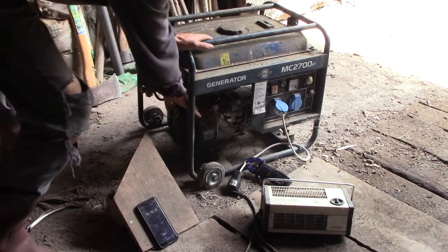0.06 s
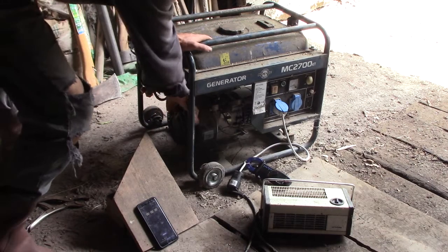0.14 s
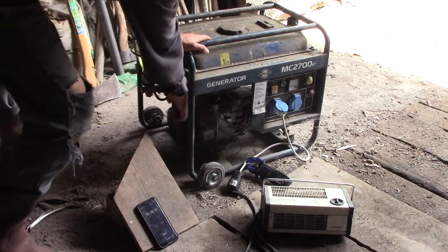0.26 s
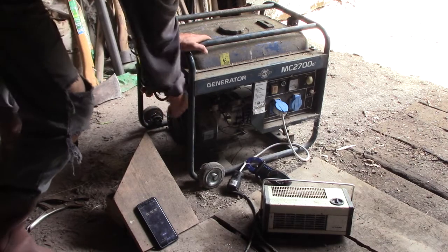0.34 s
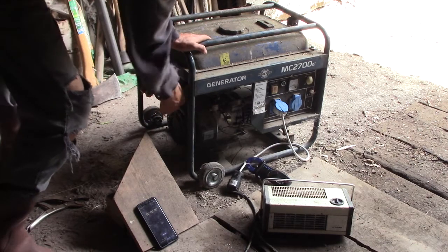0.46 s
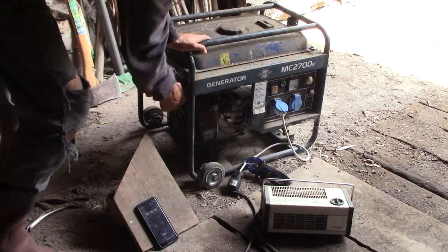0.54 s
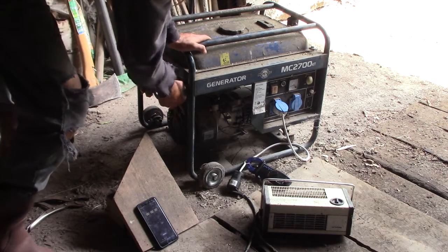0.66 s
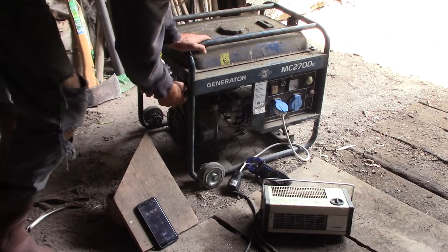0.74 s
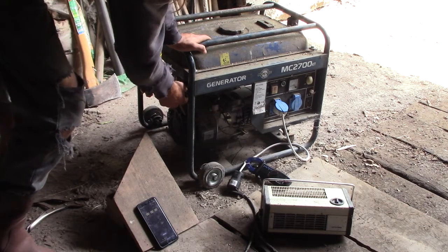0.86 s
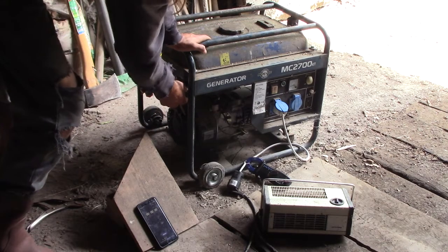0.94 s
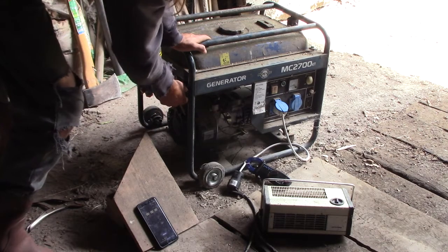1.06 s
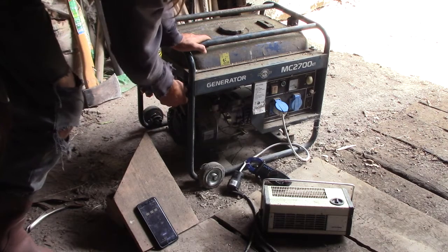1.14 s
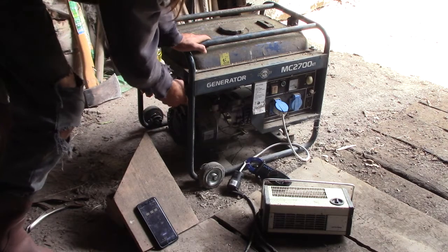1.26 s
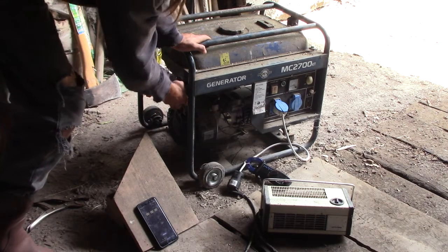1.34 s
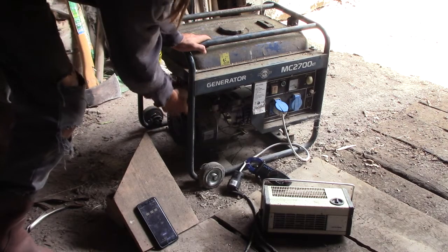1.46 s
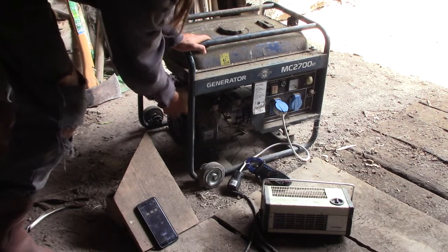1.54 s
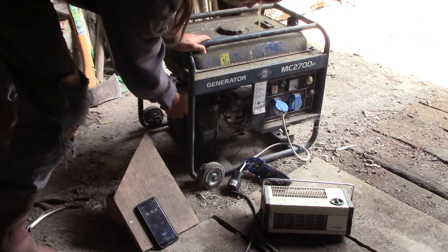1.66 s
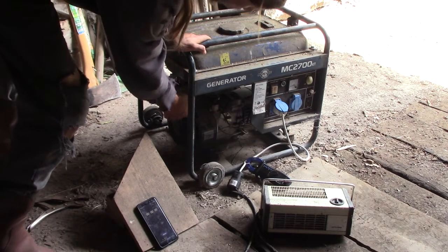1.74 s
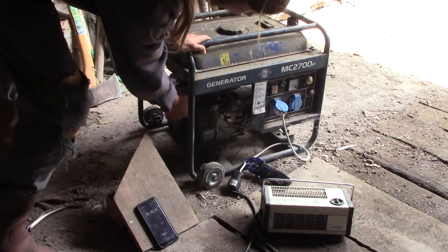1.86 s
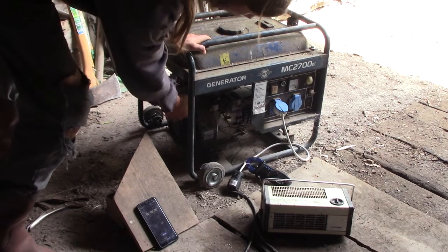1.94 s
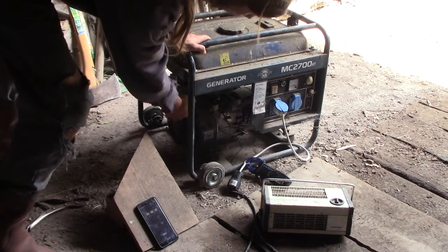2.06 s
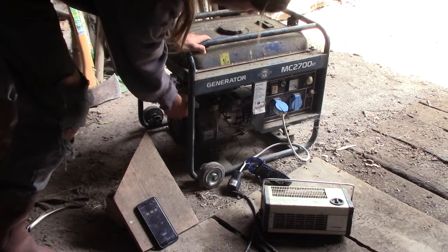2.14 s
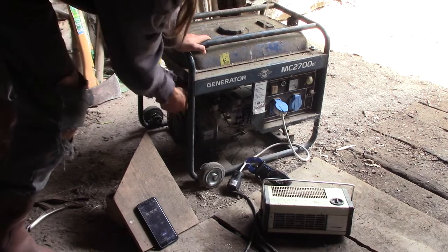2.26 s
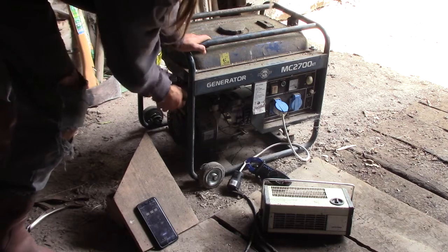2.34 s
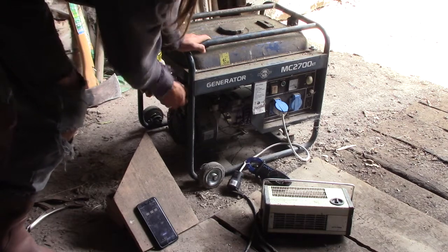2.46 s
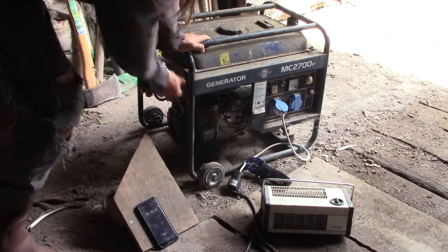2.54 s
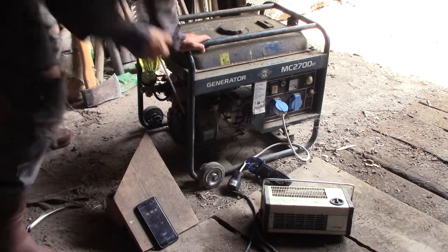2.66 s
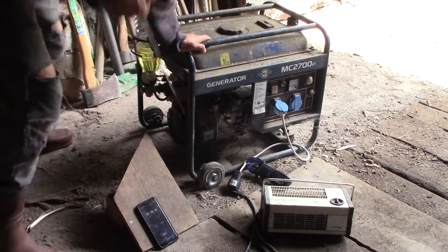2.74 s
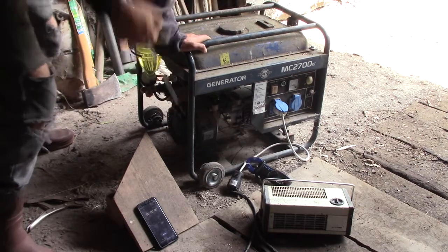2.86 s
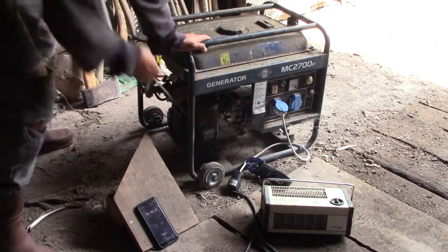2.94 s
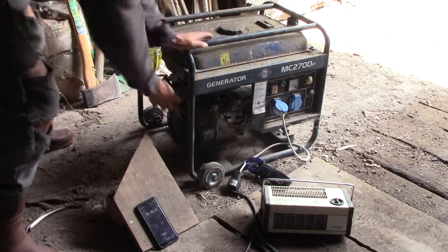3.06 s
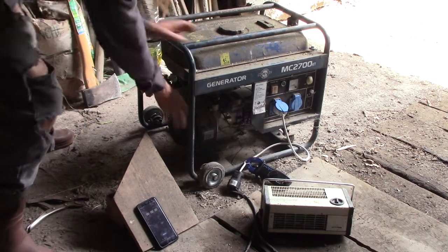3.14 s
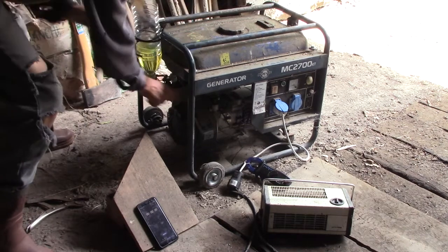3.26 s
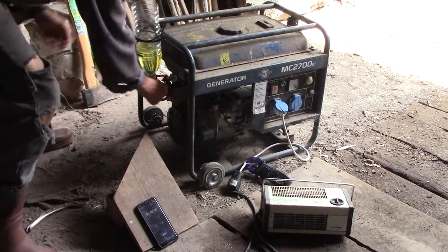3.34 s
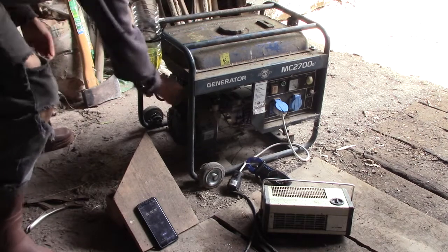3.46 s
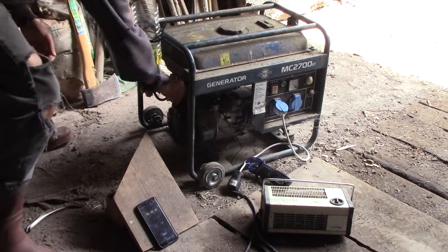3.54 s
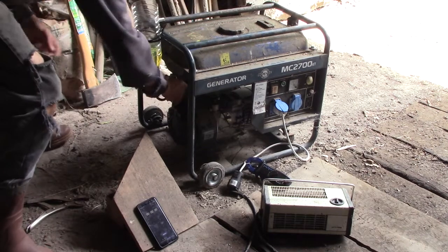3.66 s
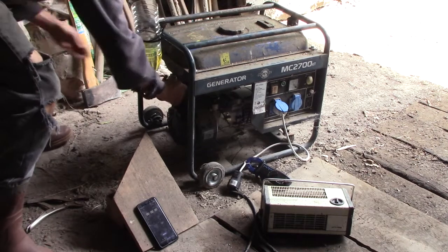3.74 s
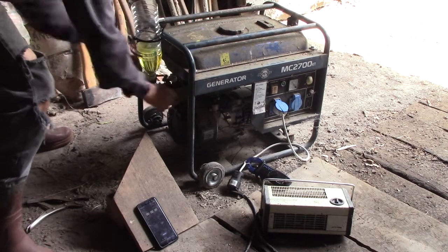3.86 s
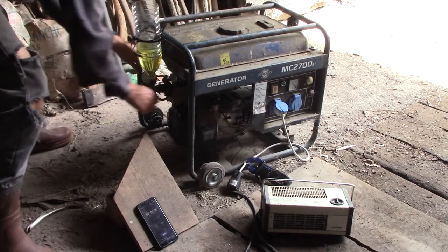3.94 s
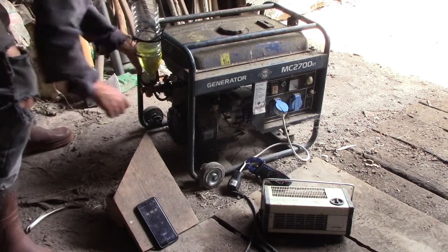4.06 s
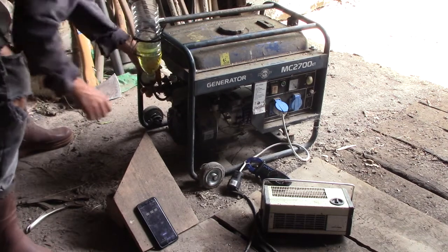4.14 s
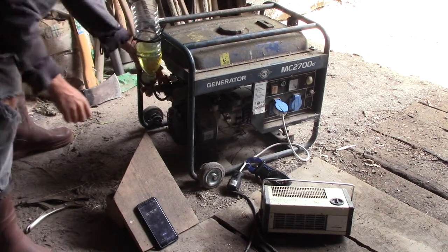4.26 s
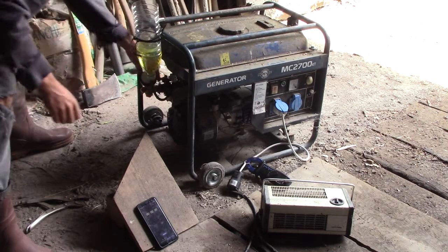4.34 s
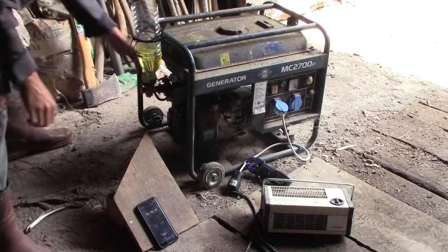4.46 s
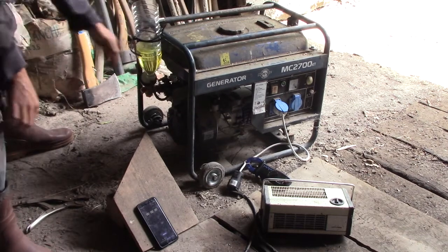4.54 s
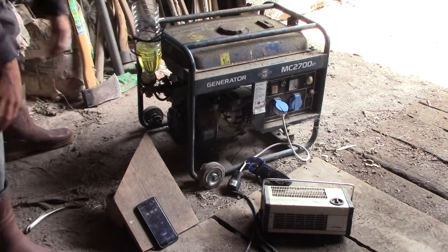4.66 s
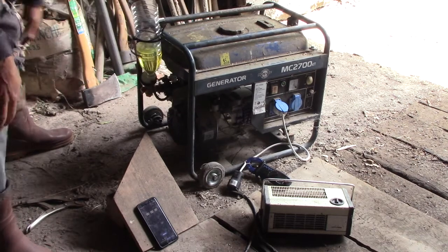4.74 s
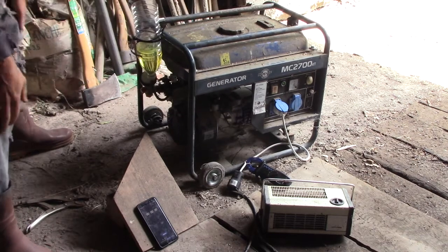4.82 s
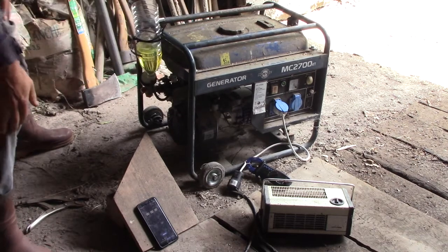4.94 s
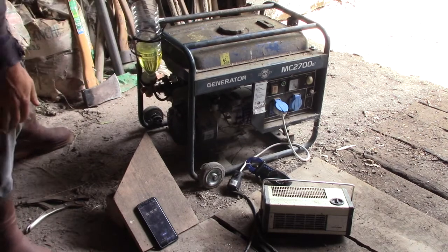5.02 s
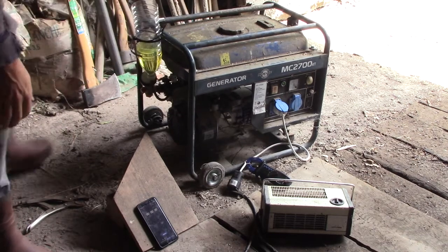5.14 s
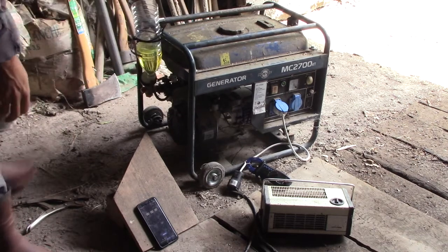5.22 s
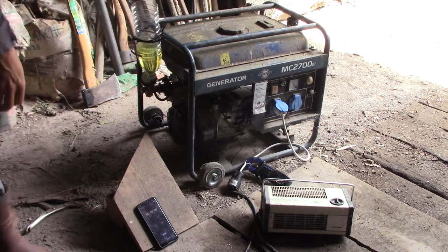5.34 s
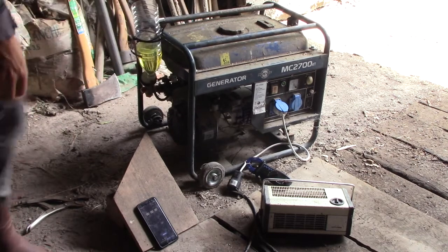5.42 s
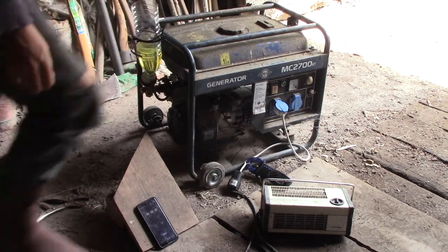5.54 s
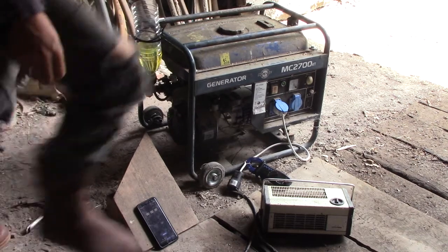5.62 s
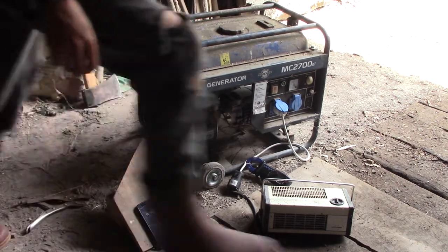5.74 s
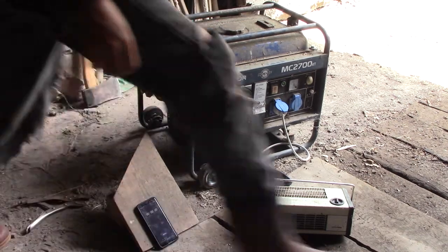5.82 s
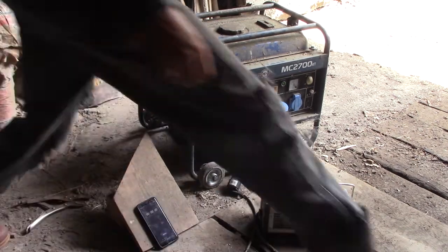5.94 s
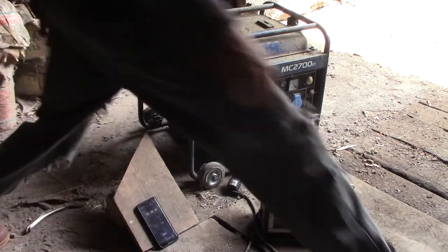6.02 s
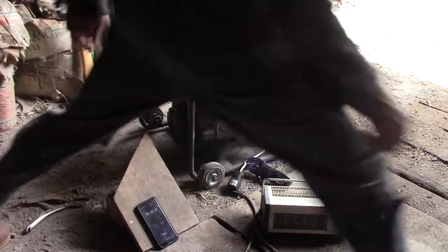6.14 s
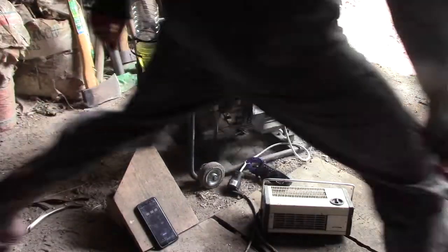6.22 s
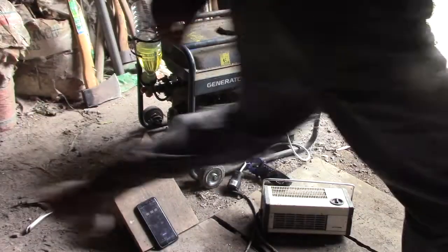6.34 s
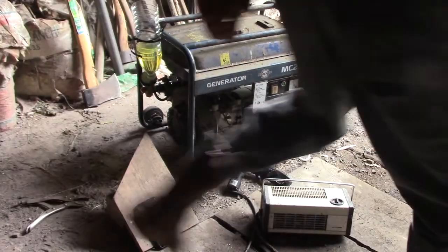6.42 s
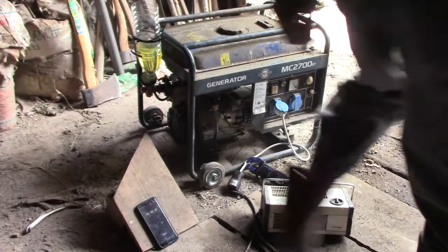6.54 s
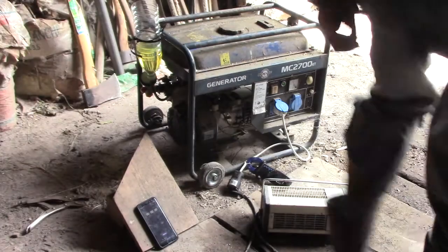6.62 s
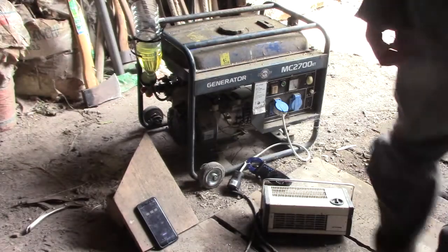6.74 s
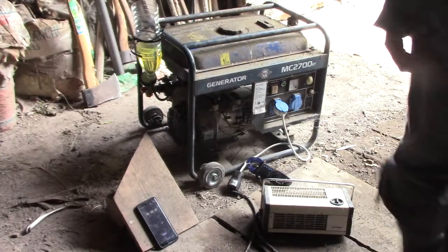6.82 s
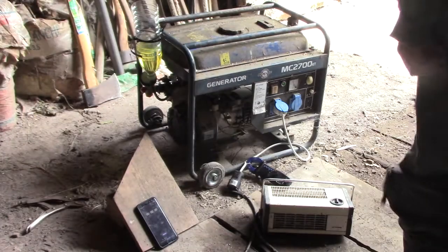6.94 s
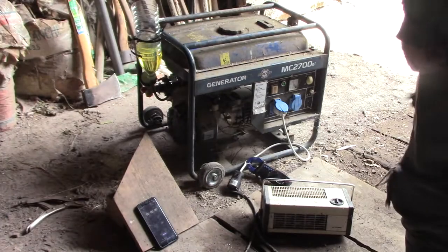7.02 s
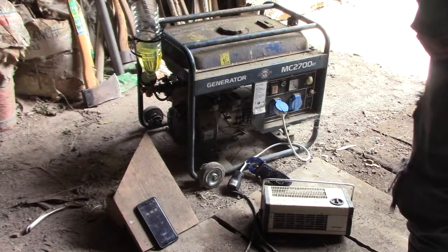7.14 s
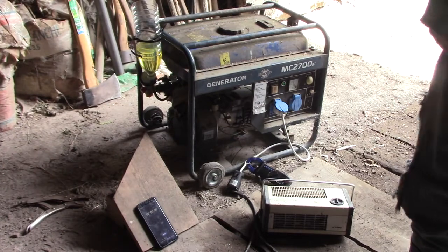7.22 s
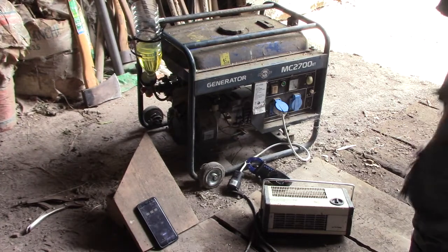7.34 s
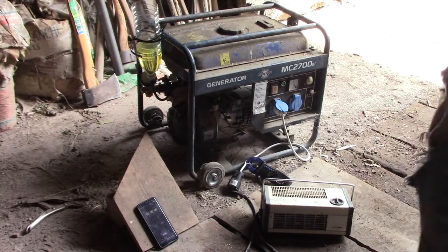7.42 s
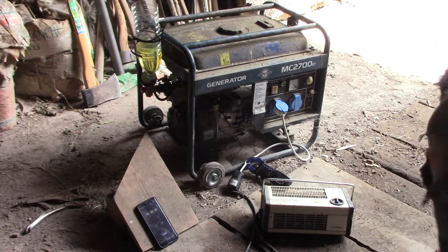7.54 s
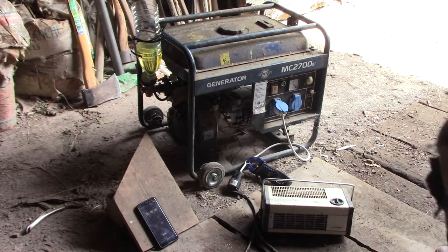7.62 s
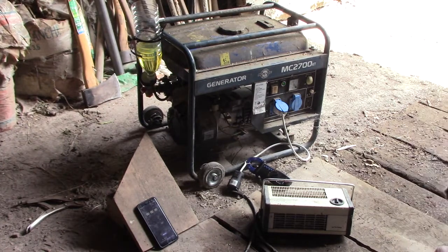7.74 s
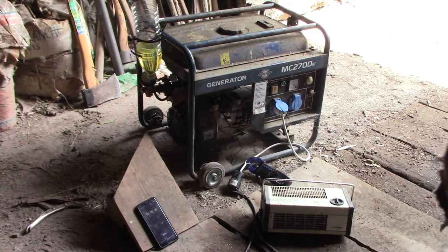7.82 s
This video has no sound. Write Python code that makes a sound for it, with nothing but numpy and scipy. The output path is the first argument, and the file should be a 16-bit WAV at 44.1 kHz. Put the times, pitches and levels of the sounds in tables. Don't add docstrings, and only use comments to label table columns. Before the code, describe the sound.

A small generator is pull-started in an open barn: quiet metallic clicks, sharp clatter, slow separate puffs, a stumbling rise, then fast buzzing running.

```python
import sys
import numpy as np
from scipy import signal
from scipy.fft import rfft, irfft, next_fast_len
from scipy.io import wavfile
from scipy.ndimage import uniform_filter1d, minimum_filter1d, map_coordinates

SR = 44100
rng = np.random.default_rng(int(sys.argv[2]) if len(sys.argv) > 2 else 0)


def how_loud(loudness_db):
    steps = np.asarray(loudness_db, float) / 20
    return 10 ** steps


def waveform_to_disk(signal):
    frames = np.transpose(np.atleast_2d(signal))
    scaled = np.clip(frames, -1, 1) * 32767
    samples = np.round(scaled).astype(np.int16)
    wavfile.write(sys.argv[1], SR, samples)


N = 347949
TIME = np.arange(N) / SR

# time_s, four-stroke cycles_per_s
SPEED = [(2.5, 6.0), (2.916, 12.07), (3.305, 16.07), (3.818, 15.6), (3.992, 14.39), (4.242, 20.89),
         (4.303, 17.02), (4.78, 21.44), (4.869, 21.65), (5.157, 26.91), (5.318, 29.07), (5.848, 32.06),
         (6.259, 33.37), (6.637, 33.91), (6.784, 33.36), (7.064, 33.76), (7.89, 34.08)]
FIRST_FIRE_S = 2.916
EVERY_CYCLE, RUNS_SMOOTH = 18, 32
STARVED = [23]
# time_s, peak_db
CHARGE = [(2.92, -19.5), (3.07, -12), (3.21, -22.5), (3.34, -11.5), (3.59, -11.5), (3.72, -20.5),
          (3.85, -16), (3.98, -11), (4.1, -16), (4.19, -11.5), (4.27, -11), (4.33, -22), (4.45, -11),
          (4.57, -16.5), (4.66, -20), (4.76, -16.5)]
# time_s, level_db
LOAD = [(4.8, -30.5), (4.9, -27), (5.05, -26.5), (5.3, -29), (5.8, -32.5), (5.97, -22.5), (6.45, -28),
        (7.89, -26.5)]
# time_s, level_db
EFFORT = [(2.47, -71), (2.59, -47), (2.77, -38), (2.89, -41.5), (3.07, -41.5), (3.4, -41.5), (3.98, -41),
          (4.14, -34.5), (4.25, -38), (4.82, -37.5), (5.26, -32.5), (5.5, -31.5), (6.0, -34), (6.6, -32),
          (7.89, -32)]
# cycles_per_s, rumble_db, casing_db, fan_db (all three over the effort), drone_db
BY_SPEED = [(7, -12, 2, -5.5, -60), (11.7, 2.5, 1, -10, -60), (15, 5.5, 4.5, -9, -61),
            (19.9, 10, 6.5, -7.5, -36), (23.5, 5, 4, -8, -28.5), (27.2, 2.5, 4.5, -8, -33.5),
            (30.1, -8, 2, -8, -30), (31.7, -6, 3, -5, -25.5), (33.3, -5, 1.5, -8, -32.5),
            (35.16, -26, -1, -5.5, -36.5)]
# pitch_hz, width_hz, level_db
COLD_SILENCER = [(100, 50, -22), (198, 18, -5), (262, 16, 1), (315, 9, 11.5), (338, 9, 7), (368, 16, 0),
                 (408, 24, -6), (320, 200, -24), (690, 50, -20)]
# pitch_hz, width_hz, level_db
WARM_SILENCER = [(303.7, 19, -1), (339.3, 35, 1.5), (404.4, 40.4, 6), (497.6, 77, -9.5), (748.3, 13.8, -2),
                 (980, 5.3, -26), (1341, 30, -10.5)]
# pitch_hz, delay_s (negative is early)
BAFFLE = [(220, -.011), (480, -.002), (800, -.005)]
# pitch_hz, inner_width_hz, outer_width_hz
DEAD_NOTES = [(441, 6, 50), (256, 6, 16)]
# order, speeding_up_db, settled_db
DRONE = [(2, -8, -8), (3, -17, -6), (4, -3, 1), (5, -5, -8), (6, -20, -8), (7, -3, -9), (8, -22, -13),
         (9, -4, -26), (10, -9, -28), (11, -7, -30), (12, -16, -30), (13, -20, -40), (14, -5, -5),
         (15, -24, -1), (16, -30, -7)]
SETTLES = [30.5, 33.4]
# pitch_hz, width_hz, level_db
KNOCK = [(504, 11, -9), (690, 46, -25), (981, 8.1, 6.5), (1084, 31, 5), (1200, 13, 4.5), (1220, 27, 6),
         (1350, 70, 0), (1390, 21, 5), (1610, 16, 4.5), (2087, 8.3, 7), (2210, 26, -18), (2590, 23, -1.5),
         (2746, 26, -1), (3350, 32, -8)]
# pitch_hz, width_hz, level_db
FLUTTER = [(1347, 22, 2.5), (1420, 57, -3), (3370, 590, -14)]
# pitch_hz, width_hz, level_db
CASING = [(680, 8.4, -45), (1005, 15, -3.5), (1390, 16, -41), (1623, 18, 0), (2090, 26, 1),
          (2370, 440, 5.5), (3440, 49, -8)]
# pitch_hz, width_hz, level_db
IDLING = [(1454, 8, 9), (2385, 33, 6), (4010, 63, 1.5), (8800, 130, -65), (11500, 370, -5)]
# pitch_hz, width_hz, level_db
FINS = [(8600, 220, -9.5), (9000, 48, -5)]
# pitch_hz, level_db_per_hz
RUMBLE = [(15, -69), (40, -45), (90, -18), (174, -5), (263, -3), (311, -1), (370, -4), (414, -4.5),
          (453, -27), (550, -22), (720, -23), (1210, -120)]
# pitch_hz, level_db_per_hz
MIDDLE = [(90, -62), (260, -9.5), (450, -3), (560, -3), (746, 1.5), (845, -10), (1340, -4), (2000, -42),
          (2600, -24.5), (4400, -120)]
# pitch_hz, level_db_per_hz
UPPER = [(300, -72), (1000, -14.5), (1700, 1.5), (2100, 0), (2280, 1), (2620, -2.5), (3350, -3.5),
         (5000, -11.5), (6500, -17.5), (11000, -120)]
# pitch_hz, level_db_per_hz
FAN = [(500, -60), (1500, -23), (2650, 0), (4500, -2), (4900, -8), (5590, 3.5), (6470, 0), (7230, 4),
       (8930, 6.5), (10400, 2), (12800, -11.5), (15100, -17), (15900, -33)]
# time_s, peak_db, bright_edge_db
RATTLES = [(4.0627, -22.5, -13), (4.122, -19.5, -15), (4.1767, -22.5, -8.5), (4.227, -23, -24),
           (4.279, -24.5, -13), (4.332, -22, -16), (4.389, -18.5, -32), (4.4436, -20.5, -15),
           (4.4984, -21, -22), (4.5496, -22, -26), (4.6029, -22, -16), (4.652, -23.5, -10),
           (4.709, -31, -3)]
# pitch_hz, width_hz, level_db
PANEL = [(1850, 250, -6), (2700, 250, -3), (3150, 250, 0), (3500, 250, -1), (4200, 400, -8),
         (8000, 4000, -26)]
# pitch_hz, width_hz, level_db
EDGE = [(1820, 260, 12), (7100, 3800, -10), (10600, 2100, -8)]
# pitch_hz, width_hz, level_db
TAPPET = [(4170, 210, -28), (6930, 700, -3.5), (10740, 430, -0.5), (13000, 2000, -14)]
# pitch_hz, width_hz, level_db
COVER = [(1430, 45, 0), (4150, 220, -15)]
# late_cycles, peak_db, low_knock_db, bright_snap_db
VALVE_CLATTER = [
    (0.069, -22, -7, -14.5),
    (1.168, -30.5, 2.5, -26),
]
# pitch_hz, level_db_per_hz
ROCKING = [(20, -24), (60, -8), (110, 8), (170, -26), (300, -92)]
# time_s, peak_db, low_knock_db, bright_snap_db
CLICKS = [(0.1002, -110.5, 28.5, -22), (0.1915, -78, 5, -20), (0.261, -47.5, -11, -39),
          (0.3045, -51, 0, -21), (0.3686, -42, 1, -31), (0.386, -33, -4.5, -8), (0.688, -55, 4, -17),
          (1.0073, -57, 10, -12), (1.254, -64, 6, -22), (1.3215, -66, 0, -19), (1.553, -48, 10, -33),
          (1.7804, -80, 5, -19), (2.0418, -62, 7, -21), (2.116, -50, -12, -13), (2.168, -48, -5, -28),
          (2.191, -50, 3, -35), (2.2525, -35.5, 0, -6), (2.4094, -58, -7, -19), (2.4309, -52, -3, -15)]
# time_s, peak_db, low_knock_db, bright_snap_db
CLATTER = [(2.4824, -61, 5, -3), (2.5245, -47, 9, -3), (2.5827, -28.5, 0, -24), (2.6338, -31, 3, -16),
           (2.655, -38.5, -18, 0.5), (2.704, -22, 1, 0.5), (2.7302, -14.5, -7.5, -3),
           (2.7583, -24, -17, -7), (2.7894, -22.5, -5, -4), (2.8588, -26.5, -7, -27), (2.9344, -24, 2, -12)]
# time_s, peak_db, low_knock_db, bright_snap_db
HANDLE = [(3.085, -8.5, -5, -35)]
# pitch_hz, level_db, time_to_fall_60_db_s
STEEL = [(1200, -1, 0.065), (1370, 11, 0.023), (1776, -3.5, 0.073), (2140, -19, 0.074), (2450, -7.5, 0.1),
         (2905, -1, 0.042), (3390, 0, 0.04), (3700, -15, 0.059)]
# pitch_hz, level_db, time_to_fall_60_db_s
PAWL = [(5700, -14, .03), (7300, -10, .02), (8420, 0, .03), (9100, -6, .025), (10300, -12, .03)]
# pitch_hz, level_db, time_to_fall_60_db_s
TANK = [(520, -12, 0.05), (600, -1, 0.06), (750, 0, 0.09), (957, -7, 0.046)]
# time_s, peak_db, pitch_hz
THUDS = [(.097, -60, 700), (.401, -57, 258), (1.56, -67, 680), (2.267, -54, 402), (2.271, -59.5, 270),
         (2.622, -37.5, 680), (2.755, -29, 706), (2.537, -44.5, 650), (2.803, -30.5, 738),
         (3.087, -24, 690)]
# ratio_to_pitch, level_db, time_to_fall_60_db_s
DULL_BODY = [(1, -4.5, 0.072), (1.3, -17, 0.068)]
# time_s, peak_db, pitch_hz, time_to_fall_60_db_s
PINGS = [(.261, -52, 1430, 0.065), (.262, -58, 3200, 0.053), (0.387, -55, 3230, 0.084),
         (.388, -62, 12150, .12), (.400, -41, 467, 0.062), (1.5535, -60, 3500, 0.037),
         (1.5535, -59, 3050, 0.045), (1.5535, -60, 2640, .04), (2.254, -57, 13170, .07),
         (2.254, -59, 3270, 0.072), (0.387, -39, 1405, 0.043), (1.554, -57, 1400, 0.065),
         (2.116, -58, 1390, 0.11), (2.118, -71, 2000, .12), (2.168, -51, 1410, .06),
         (2.191, -48, 1400, 0.067), (2.2535, -43, 1450, 0.043), (2.2535, -51, 2659, 0.054),
         (2.2535, -51, 4145, 0.066), (2.266, -42, 446, 0.14), (2.576, -37, 985, 0.14),
         (2.7285, -23, 1740, 0.053), (2.7336, -23, 4160, 0.061), (2.7302, -30, 2500, 0.092),
         (2.707, -34, 4160, 0.074)]
# time_s, peak_db
SCRAPES = [(2.735, -32), (2.765, -39), (2.8, -41), (3.08, -23), (3.1, -28), (3.125, -38), (3.155, -33),
           (.262, -60), (.29, -61), (.62, -67), (.70, -64), (.76, -67), (1.25, -69), (1.32, -74),
           (1.4, -69), (1.555, -64), (2.12, -62), (2.17, -58), (2.195, -64)]
# pitch_hz, width_hz, level_db
GRIT = [(700, 250, -20), (1500, 600, 2.5), (2500, 840, 0.5), (3480, 850, -6), (7840, 3200, -16)]
# time_s, peak_db
TICKS = [(2.5205, -44), (2.5645, -48), (2.6345, -46), (2.687, -50), (2.797, -34), (2.839, -42),
         (2.8835, -36), (2.911, -40), (2.965, -49)]
# pitch_hz, width_hz, level_db
TOOTH = [(8400, 550, -2), (9250, 400, 0), (10800, 900, 0), (14000, 3000, -11)]
# time_s, peak_db
SQUEAK = [(5.85, -52)]
# pitch_hz, width_hz, level_db
SOLE = [(14000, 1800, 0)]
# time_s, width_s, level_db
RUSTLE = [(.33, 0.35, -62.5), (1.58, 0.26, -72), (2.25, 0.14, -60.5)]
# pitch_hz, level_db_per_hz
SLEEVE = [(40, -70), (150, -26), (500, 2.5), (800, -3), (1500, -9), (3500, -19.5), (8000, -26),
          (14000, -70)]
# pitch_hz, level_db_per_hz
YARD = [(15, -25), (40, -20), (141, -9), (229, -3), (284, -4), (487, -2.5), (792, -9), (1320, -14),
        (2270, -22.5), (2460, -22), (2670, -22), (8520, -32.5), (15900, -40)]
# pitch_hz, time_to_fall_60_db_s
BARN = [(200, 0.44), (1000, 0.28), (4000, 0.2), (12000, 0.14)]
# pitch_hz, side_minus_mid_db
APART = [(30, -12), (60, -30), (110, -47), (200, -54), (380, -37), (700, -34), (1290, -31.5), (2380, -26.5),
         (4400, -22.5), (8120, -19), (15000, -12)]


def unit(x):
    return x / np.sqrt(np.mean(x ** 2) + 1e-20)


def along(points, hz):
    f, v = np.transpose(points)
    return np.interp(np.log(hz + 1), np.log(f + 1), v)


def curves(rows):
    s, *cols = np.transpose(rows)
    return [np.interp(TIME, s, c) for c in cols]


def by_speed():
    rate, *cols = np.transpose(BY_SPEED)
    speed = curves(SPEED)[0]
    return [np.interp(speed, rate, c) for c in cols]


def wobble(rate):
    coarse = TIME[::64]
    knots = rng.standard_normal(int(N * rate / SR) + 4)
    return np.interp(TIME, coarse, map_coordinates(knots, [coarse * rate]))


def swell(s, width):
    return np.exp(-((TIME - s) / width) ** 2)


def ramp(start_s, length_s):
    return np.clip((TIME - start_s) / length_s, 0, 1)


def filtered(x, response):
    m = next_fast_len(N + SR // 2)
    return irfft(rfft(x, m) * response(np.fft.rfftfreq(m, 1 / SR)), m)[..., :N]


def resonances(modes, flip=-1):
    def response(f):
        total = 0
        for k, (c, w, db) in enumerate(modes):
            total = total + flip ** k * how_loud(db) * 1j * f * w / (c * c - f * f + 1j * f * w)
        return total
    return response


def noise(spectrum):
    return unit(filtered(rng.standard_normal(N), lambda hz: how_loud(along(spectrum, hz))))


def bursts(rows, modes, rise, gain_db):
    envelope = np.zeros(N + SR)
    u = np.arange(SR // 10) / SR / rise
    for s, db in rows:
        envelope[round(s * SR):][:len(u)] += how_loud(db + gain_db) * u * np.exp(1 - u)
    return envelope[:N] * unit(filtered(rng.standard_normal(N), resonances(modes)))


def ring(modes, t, crack, crack_s=0.056, wander=0, after_db=-60):
    draw = rng.standard_normal((len(modes), 2))
    drift = np.zeros((len(modes), 1))
    if wander:
        drift = wander * np.cumsum(rng.standard_normal((len(modes), len(t))), 1)
    tone = 0
    for (hz, db, t60), (a, b), d in zip(modes, draw, drift):
        phase = 2 * np.pi * hz * (1 + .012 * b) * t + d
        tone = tone + how_loud(db + 3 * a - 60 * t / t60) * np.sin(phase)
    pitches = [m[0] for m in modes]
    edges = [.75 * min(pitches), 1.2 * max(pitches)]
    band = signal.butter(4, edges, "bandpass", fs=SR, output="sos")
    fade = how_loud(-60 * t / crack_s) + how_loud(after_db - 60 * t / .2)
    blow = tone + crack * fade * unit(signal.sosfilt(band, rng.standard_normal(len(t))))
    return blow / abs(blow).max()


def crank():
    cycles = np.cumsum(curves(SPEED)[0]) / SR
    return cycles - np.interp(FIRST_FIRE_S, TIME, cycles)


def smooth_burns(cycles, lag=0):
    new_cycle = np.diff(np.floor(cycles - lag)) > 0
    return np.flatnonzero(new_cycle & (cycles[1:] > RUNS_SMOOTH - .1))


def chugs(cycles):
    k = np.arange(RUNS_SMOOTH)
    missed = (k < EVERY_CYCLE) & (k % 2 == 1)
    s = np.interp(k + .165 * missed, cycles, TIME)
    db = np.interp(s, *np.transpose(CHARGE)) - 16 * missed - 31 * np.isin(k, STARVED)
    push = np.zeros(N)
    port_opens = s - .0015
    push[np.round(port_opens * SR).astype(int)] = how_loud(db + 40.0)

    def silencer(f):
        dull = 1 + (1j * f / 420) + (1j * f / 560) ** 2
        sweep_s = .00413
        sweep = np.exp(-1j * np.pi * sweep_s * f * f / 400)
        no_bass = (1j * f / (60 + 1j * f)) ** 2
        return resonances(COLD_SILENCER, flip=1)(f) / dull * sweep * no_bass
    return filtered(push, silencer)


def baffled(x):
    return filtered(x, lambda f: np.exp(-2j * np.pi * np.cumsum(along(BAFFLE, f)) * f[1]))


def cancelled(f):
    dips = [(c * c - f * f + 1j * f * inner) / (c * c - f * f + 1j * f * outer)
            for c, inner, outer in DEAD_NOTES]
    return np.prod(dips, 0)


def exhaust(cycles):
    start_s = LOAD[0][0]
    warm = 1 - .5 * np.exp(-np.maximum(TIME - start_s, 0) / .067)
    warm = np.clip(warm, 0, 1)
    push = np.zeros(N)
    for lag, size in ((0, 1), (.5, .12)):
        at = smooth_burns(cycles, lag)
        draw = rng.standard_normal((len(at), 2))
        late = np.round(2.5 * draw[:, 0]).astype(int)
        push[np.clip(at + late, 0, N - 1)] += size * how_loud(0.7 * draw[:, 1])
    push = baffled(push)

    def warm_outlet(f):
        little_bass = np.sqrt(1 + (257 / (f + 1)) ** 10)
        return resonances(WARM_SILENCER)(f) * cancelled(f) / little_bass
    fast = unit(filtered(push, warm_outlet))
    slow = unit(filtered(push, resonances(COLD_SILENCER)))
    scale = np.sqrt(np.mean(TIME > start_s))
    return how_loud(curves(LOAD)[0] + 2.5) * scale * (warm * fast + (1 - warm) * slow)


def drone(cycles):
    settled = np.interp(curves(SPEED)[0], SETTLES, [0, 1])
    orders = 0
    for k, rising, level in DRONE:
        db = rising + settled * (level - rising) + 1.2 * wobble(3)
        orders = orders + how_loud(db) * np.sin(2 * np.pi * (k * cycles + rng.random()))
    orders = filtered(orders, lambda f: (1j * f / (130 + 1j * f)) ** 3)
    return how_loud(by_speed()[3] - 4.0) * unit(orders) * ramp(4.4, 0.7)


def knock(cycles):
    push = np.zeros(N)
    at = smooth_burns(cycles)
    push[at] = how_loud(1.6 * rng.standard_normal(len(at)))
    raps = unit(filtered(push, resonances(KNOCK)))
    return how_loud(curves(EFFORT)[0] - 6) * raps * ramp(4.8, 0.92)


def flutter(cycles):
    beats = np.arange(2 * RUNS_SMOOTH, 2 * int(cycles[-1])) / 2 + 0.29
    rows = [(s, -33.5 + 4 * rng.normal()) for s in np.interp(beats, cycles, TIME)]
    return bursts(rows, FLUTTER, rise=0.0051, gain_db=-6.5) * ramp(4.6, 1.5)


def works(cycles):
    frame_db = curves(EFFORT)[0]
    low_db, mid_db, fan_db = frame_db + by_speed()[:3]
    fan_db = fan_db - 6 * swell(5.82, .16)
    caught = ramp(4.7, .5)

    def throb(depth_db, lag):
        return how_loud(depth_db * np.cos(2 * np.pi * (cycles - lag)))

    def grain(depth_db, rate):
        return how_loud(depth_db * wobble(rate))

    def cased(x, running=0):
        fast = running * caught * filtered(x, resonances(CASING))
        return unit(x + fast + (1 - caught) * filtered(x, resonances(IDLING)))

    chatter = how_loud(1.64 * (1.42 - caught) * wobble(35))
    low_db = low_db - 5 * ramp(4.55, .2)
    low = how_loud(low_db) * unit(grain(1.8, 25) * noise(RUMBLE))
    casing = throb(0.57, 0.92) * grain(0.47, 60) * cased(noise(MIDDLE), running=3.94)
    frame = chatter * throb(0.12, 1.0) * grain(0.3, 120) * cased(noise(UPPER), running=0.11)
    air = noise(FAN)
    air = air + 0.61 * caught * filtered(air, resonances(FINS))
    fan = chatter * throb(0.044, 1.0) * grain(0.83, 90) * cased(air)
    total = low + how_loud(mid_db) * unit(casing) + how_loud(frame_db) * unit(frame) + how_loud(fan_db) * unit(fan)
    return ramp(EFFORT[0][0], 0.048) * total


def panel():
    buzz = [(s - .004, db) for s, db, _ in RATTLES]
    rim = [(s - .004, db + edge_db) for s, db, edge_db in RATTLES]
    return bursts(buzz, PANEL, rise=0.0055, gain_db=-8.5) + bursts(rim, EDGE, rise=0.0022, gain_db=4.5)


def tappets(cycles):
    times = np.interp(np.arange(0, 2 * RUNS_SMOOTH + 5) / 2 + .24, cycles, TIME)
    rows = [(s, -41.5 + 3 * rng.normal()) for s in times]
    return bursts(rows, TAPPET, rise=0.0035, gain_db=-4.0)


def rocker_cover(cycles):
    times = np.interp(np.arange(RUNS_SMOOTH) - .36, cycles, TIME)
    rows = [(s, -31 + rng.normal(0, 1.8)) for s in times]
    return bursts(rows, COVER, rise=.008, gain_db=-8.0)


def valve_clatter(cycles):
    rows = []
    for k in range(2, EVERY_CYCLE, 2):
        for late, db, low_db, high_db in VALVE_CLATTER:
            if k + late > 3:
                s = np.interp(k + late, cycles, TIME)
                rows.append((s, db + rng.normal(0, 1.8), low_db, high_db))
    return rows


def rocking():
    return how_loud(-53.5) * swell(3.32, 0.75) * ramp(EFFORT[0][0], 0.2) * noise(ROCKING)


def strikes(rows, soft):
    out, t = np.zeros(N + SR), np.arange(SR // 4) / SR
    for s, db, low_db, high_db in rows:
        tank = ring(TANK, t, crack=1.04) * (1 - np.exp(-t / 0.015))
        frame = ring(STEEL, t, crack=1.0)
        snap = ring(PAWL, t, crack=0.54, crack_s=.034, wander=.12, after_db=-25)
        blow = frame + how_loud(low_db + 4.0) * tank + how_loud(high_db + 6.5) * snap
        out[round(s * SR):][:len(t)] += how_loud(db + 3.0) * blow * (1 - np.exp(-t / soft))
    return out[:N]


def thuds():
    out, t = np.zeros(N), np.arange(SR // 8) / SR
    for s, db, hz in THUDS:
        modes = [(hz * ratio, level, t60) for ratio, level, t60 in DULL_BODY]
        blow = ring(modes, t, crack=0.23) * (1 - np.exp(-t / 0.0041))
        out[round(s * SR):][:len(t)] += how_loud(db + 13.0) * blow
    return out


def pings():
    out, t = np.zeros(N), np.arange(SR // 5) / SR
    for s, db, hz, t60 in PINGS:
        note = np.sin(2 * np.pi * hz * t) * (1 - np.exp(-t / 0.00064))
        out[round(s * SR):][:len(t)] += how_loud(db - 60 * t / t60) * note
    return out


def handling(cycles):
    hits = strikes(CLICKS, soft=0.0013) + strikes(CLATTER, soft=0.001)
    hits = hits + strikes(valve_clatter(cycles), soft=0.0021) + strikes(HANDLE, soft=0.0095)
    hits = hits + pings() + thuds()
    hits = hits + bursts(SCRAPES, GRIT, rise=0.0054, gain_db=-3)
    hits = hits + bursts(TICKS, TOOTH, rise=0.0013, gain_db=-7.5)
    return hits + bursts(SQUEAK, SOLE, rise=.008, gain_db=-2)


def rustle():
    level = sum(how_loud(db) * swell(s, width) for s, width, db in RUSTLE)
    return level * how_loud(0.67 * wobble(30.8)) * noise(SLEEVE)


def yard():
    return how_loud(-67.5 + 0.79 * wobble(6.26)) * noise(YARD)


def barn(x):
    hz, t, z = signal.stft(rng.standard_normal(SR // 2), SR, nperseg=256)
    fade = how_loud(-60 * t / along(BARN, hz)[:, None])
    tail = signal.istft(z * fade, SR, nperseg=256)[1]
    delayed = np.pad(x, (500, 0))
    return signal.fftconvolve(delayed, tail / np.linalg.norm(tail))[:N]


def scene():
    cycles = crank()
    puffs = chugs(cycles)
    engine = exhaust(cycles) + drone(cycles)
    hits = handling(cycles)
    mid = puffs + how_loud(-17) * barn(puffs)
    engine_echo = barn(filtered(engine, lambda f: 1 / (1 + (280 / (f + 1)) ** 8)))
    mid = mid + engine + how_loud(-19) * engine_echo
    mid = mid + knock(cycles) + flutter(cycles) + works(cycles)
    mid = mid + panel() + tappets(cycles) + rocker_cover(cycles) + rocking()
    mid = mid + hits + how_loud(-9.0) * barn(hits)
    mid = mid + rustle() + yard()
    side = filtered(barn(mid), lambda hz: how_loud(along(APART, hz))) + how_loud(-59) * mid
    return np.array([mid + side, mid - side])


def low_pass(x):
    return signal.sosfilt(signal.butter(12, 16010, fs=SR, output="sos"), x)


def record(dry):
    x = filtered(dry, lambda f: (1j * f / (45 + 1j * f)) ** 2 * (f < 15800))
    need = np.minimum(1, .185 / (abs(x).max(0) + 1e-9))
    gain = uniform_filter1d(minimum_filter1d(need, size=181), size=91)
    return low_pass(x * gain)


dry = scene()
out = record(dry)
waveform_to_disk(out)
```